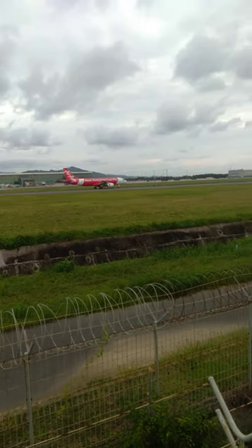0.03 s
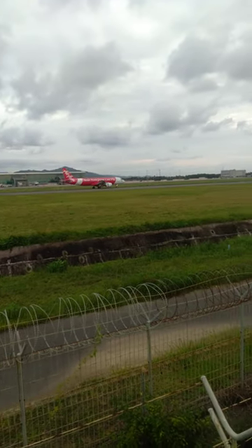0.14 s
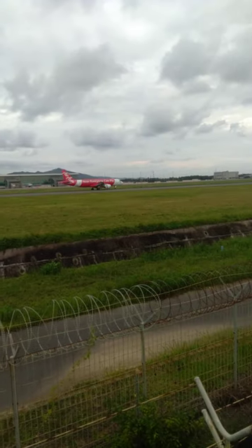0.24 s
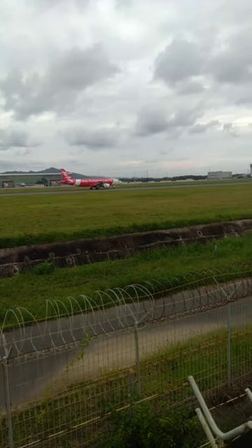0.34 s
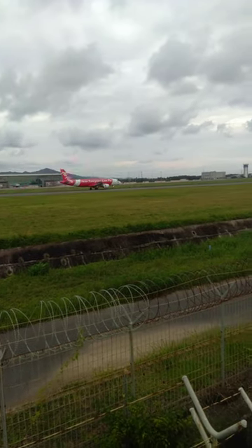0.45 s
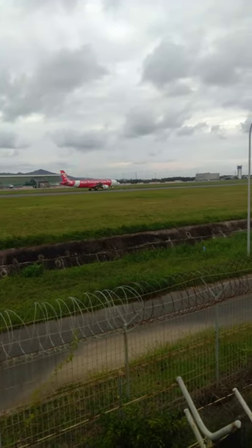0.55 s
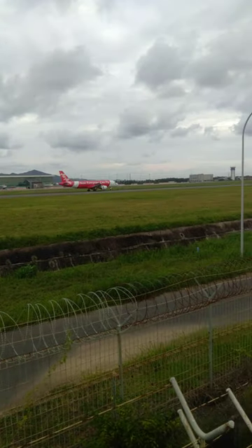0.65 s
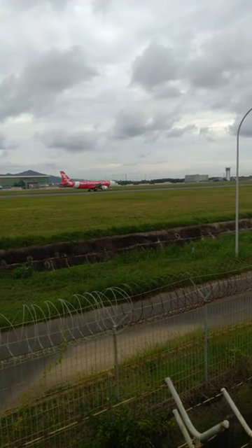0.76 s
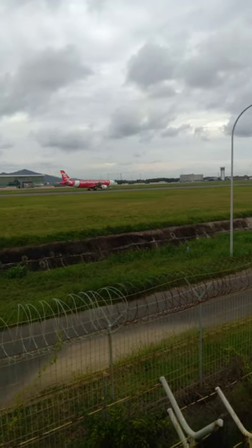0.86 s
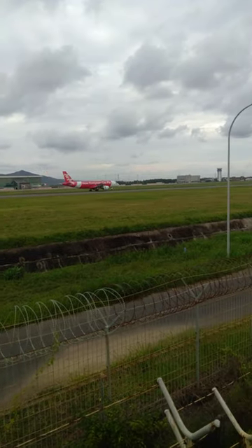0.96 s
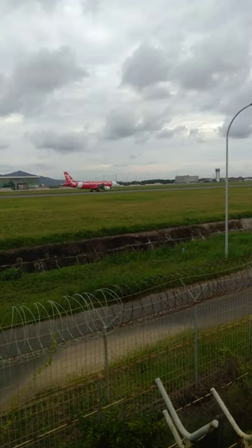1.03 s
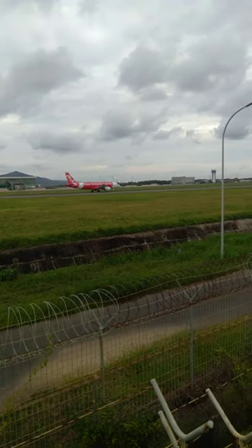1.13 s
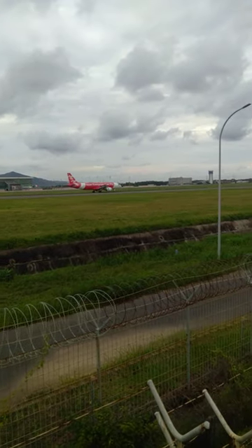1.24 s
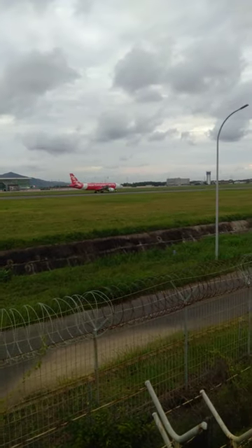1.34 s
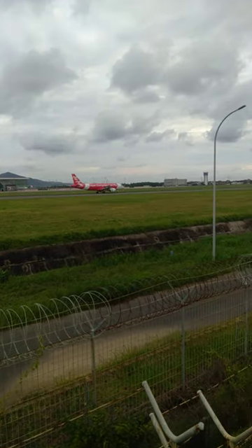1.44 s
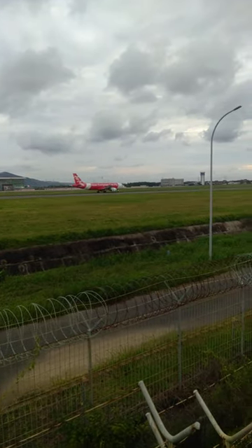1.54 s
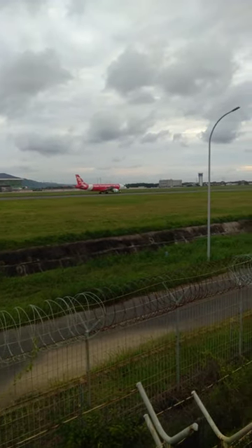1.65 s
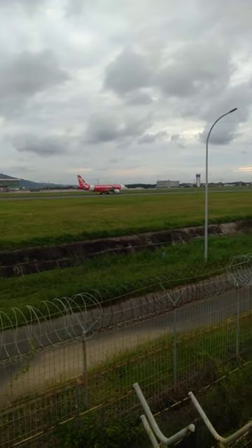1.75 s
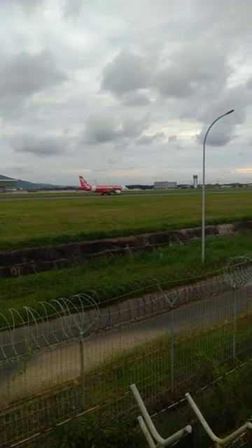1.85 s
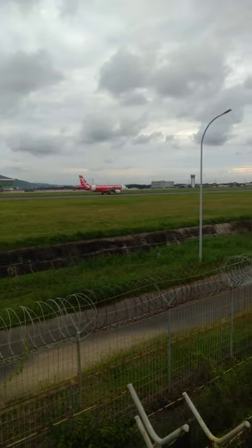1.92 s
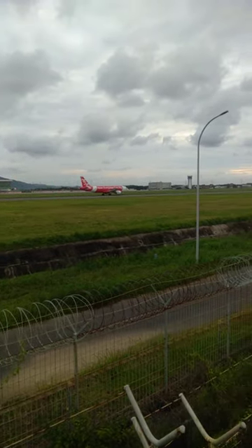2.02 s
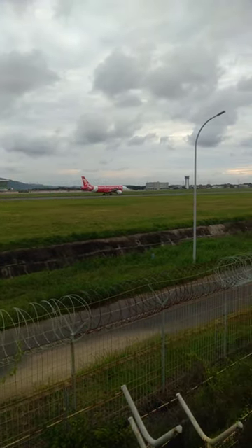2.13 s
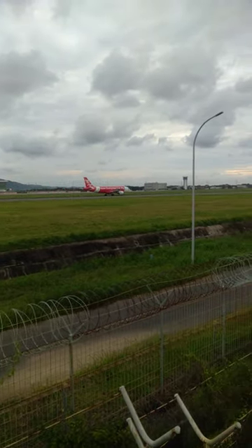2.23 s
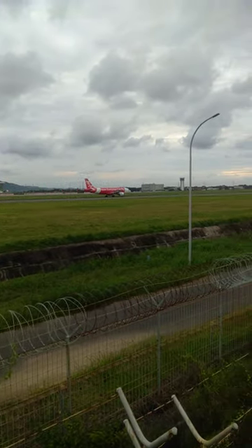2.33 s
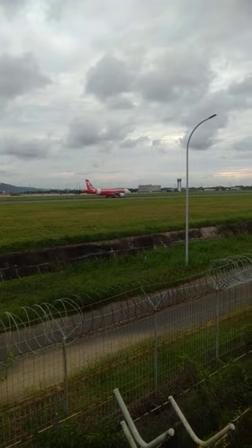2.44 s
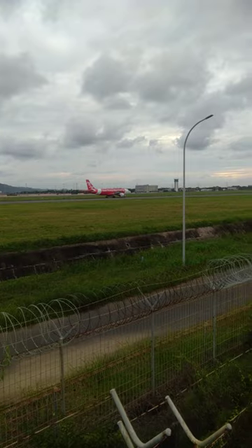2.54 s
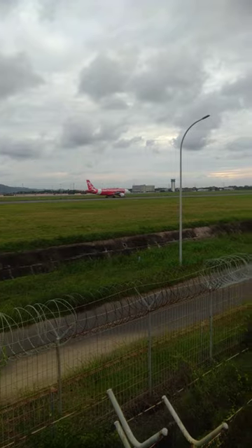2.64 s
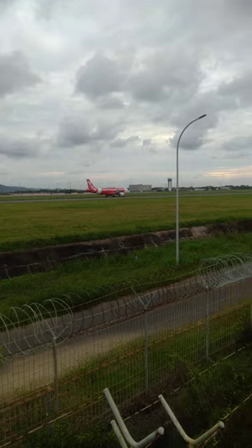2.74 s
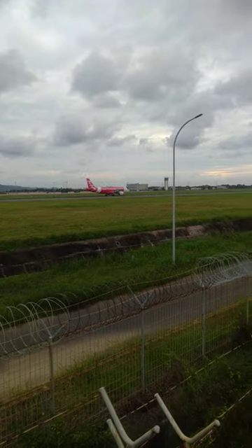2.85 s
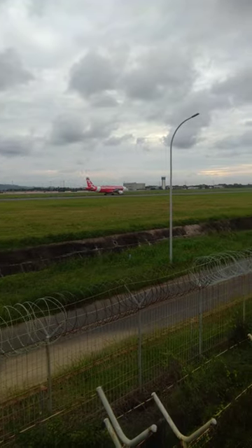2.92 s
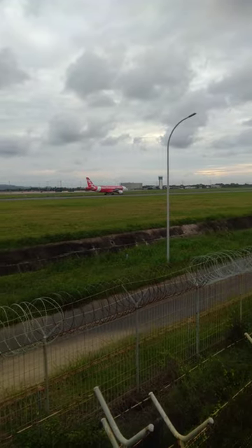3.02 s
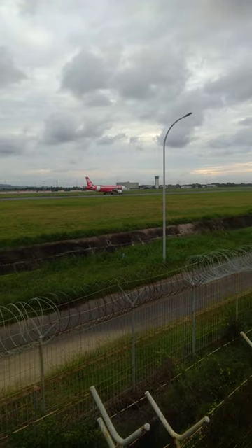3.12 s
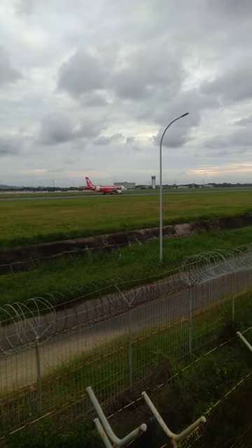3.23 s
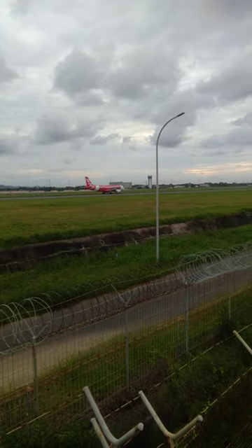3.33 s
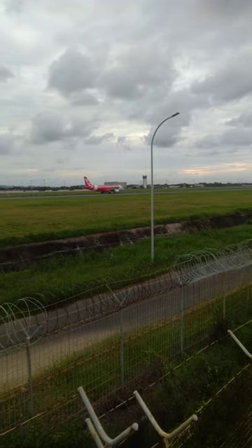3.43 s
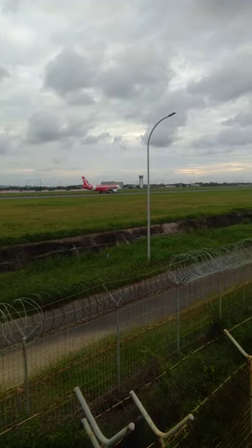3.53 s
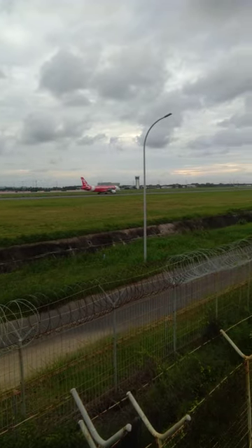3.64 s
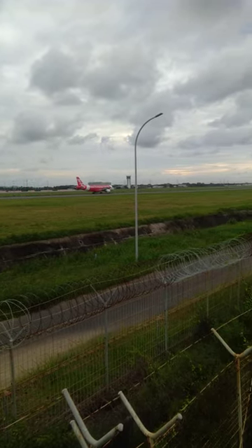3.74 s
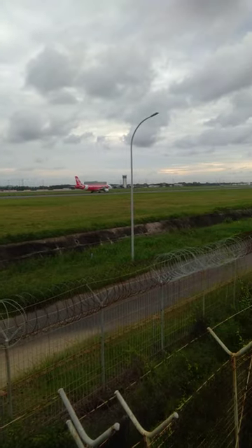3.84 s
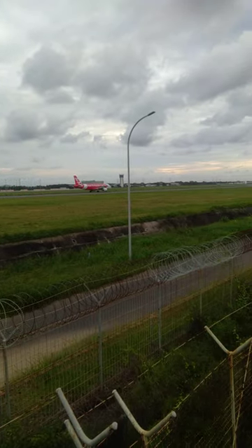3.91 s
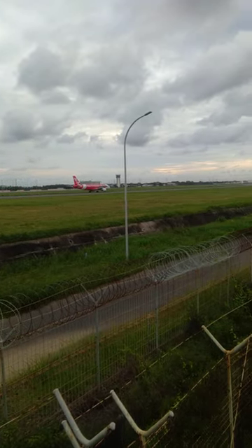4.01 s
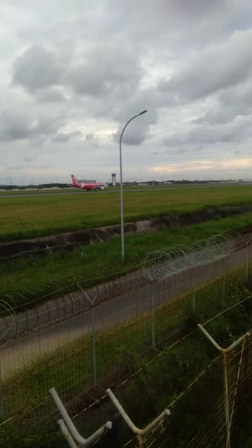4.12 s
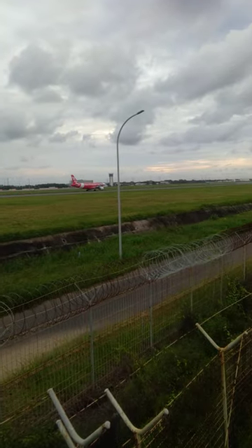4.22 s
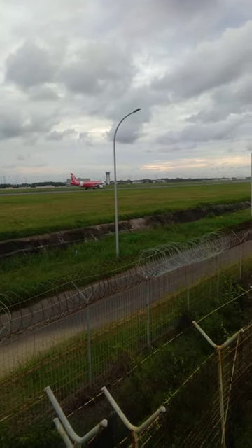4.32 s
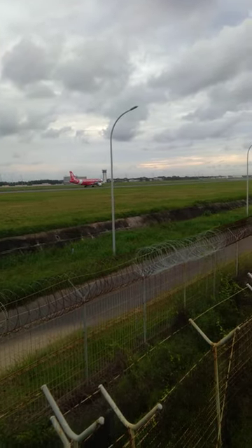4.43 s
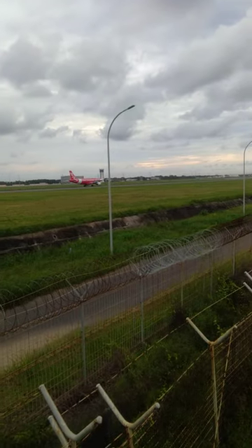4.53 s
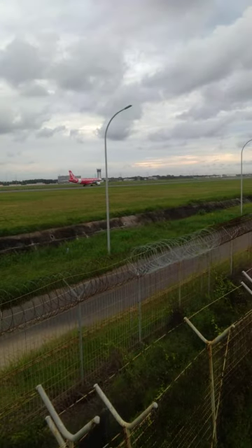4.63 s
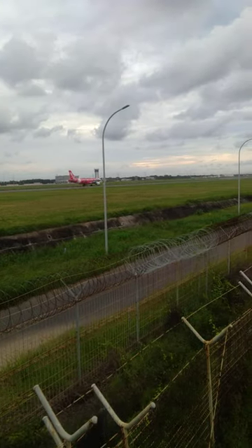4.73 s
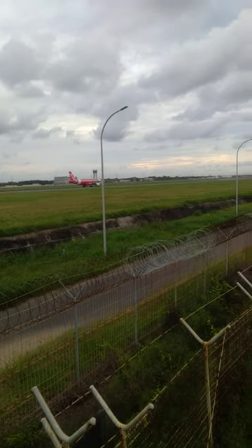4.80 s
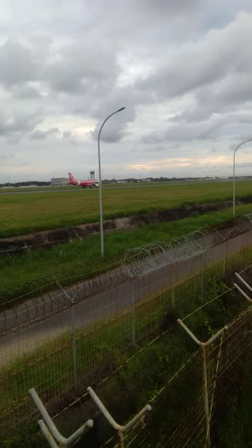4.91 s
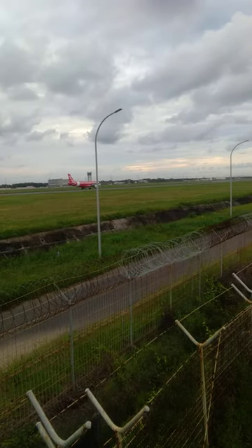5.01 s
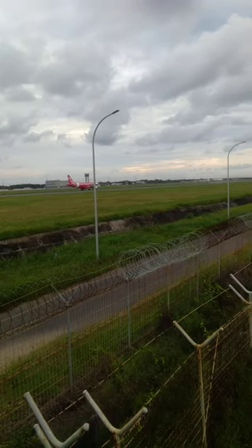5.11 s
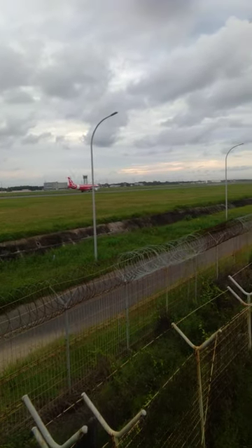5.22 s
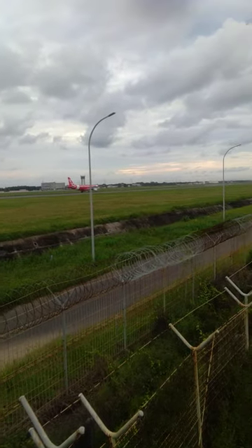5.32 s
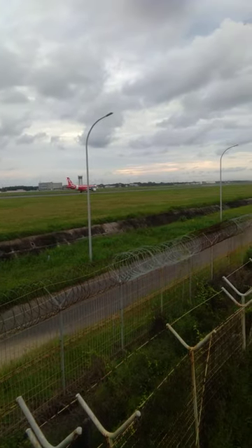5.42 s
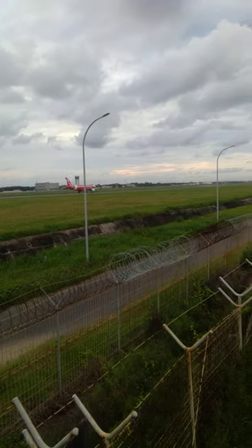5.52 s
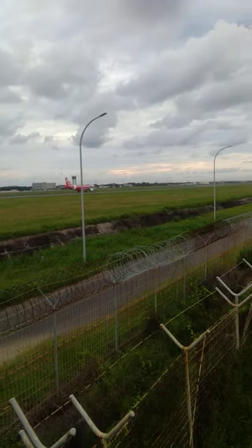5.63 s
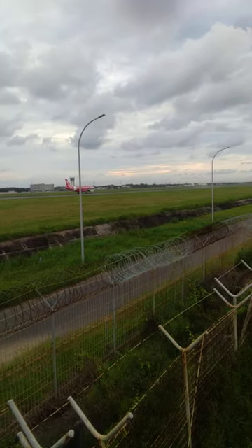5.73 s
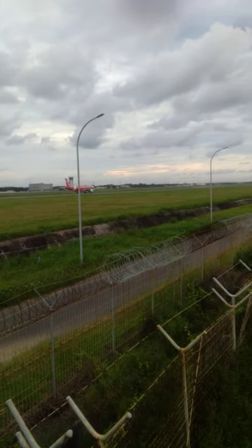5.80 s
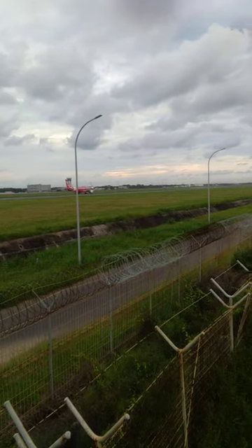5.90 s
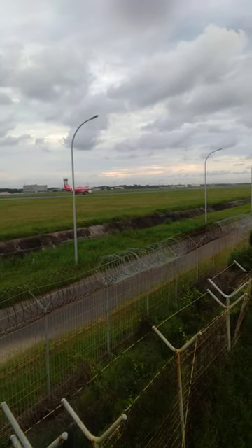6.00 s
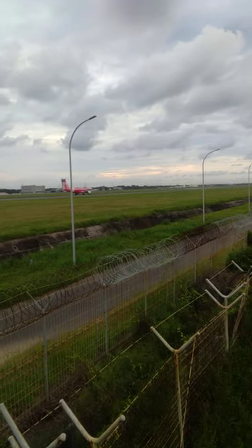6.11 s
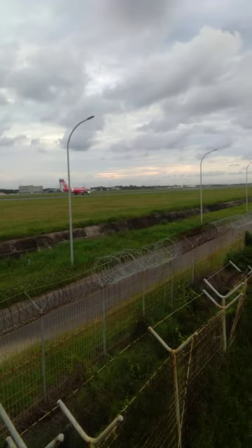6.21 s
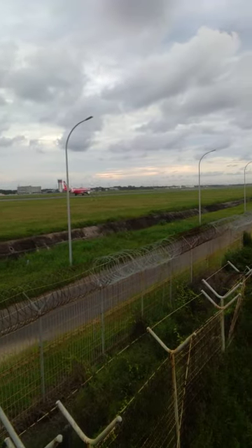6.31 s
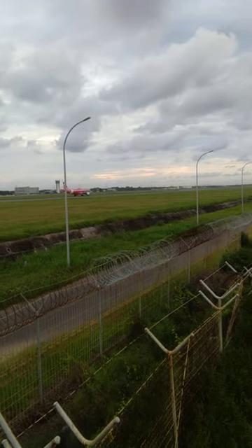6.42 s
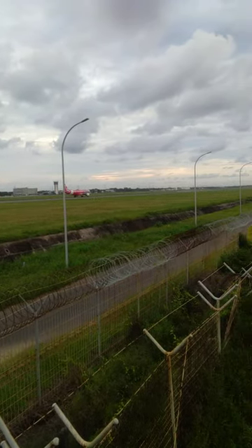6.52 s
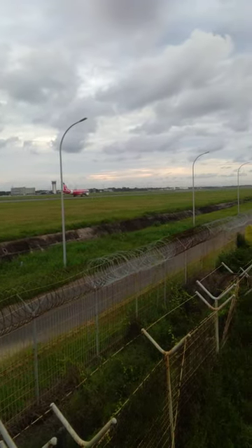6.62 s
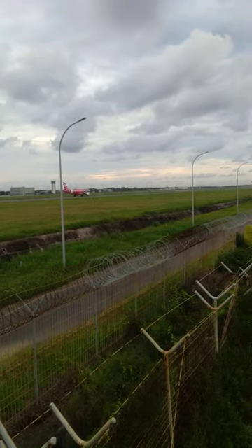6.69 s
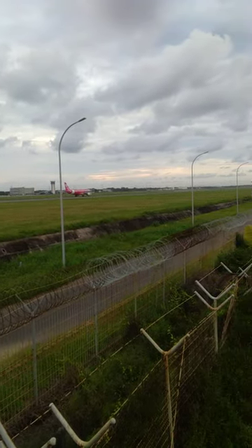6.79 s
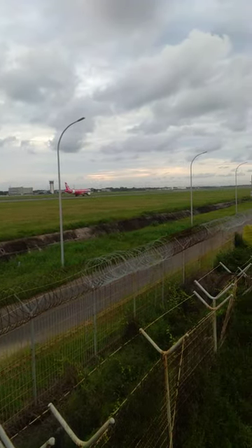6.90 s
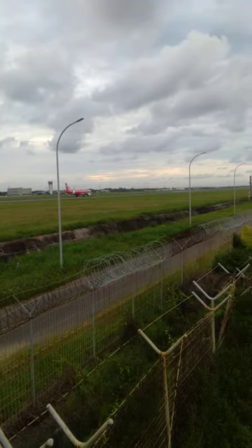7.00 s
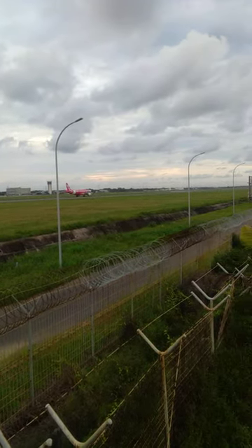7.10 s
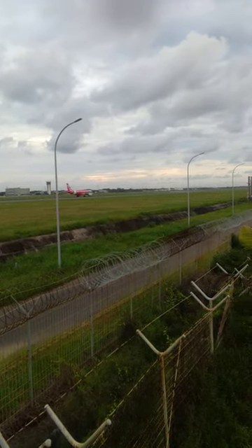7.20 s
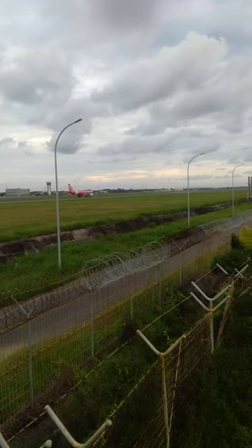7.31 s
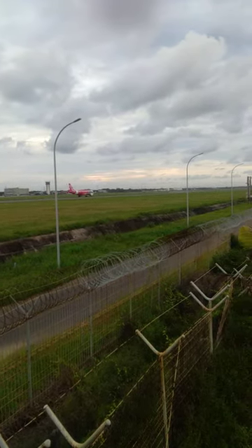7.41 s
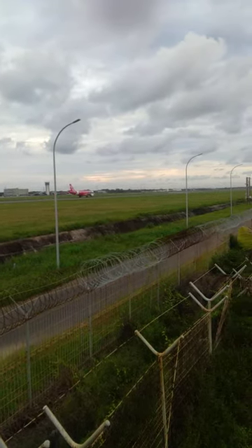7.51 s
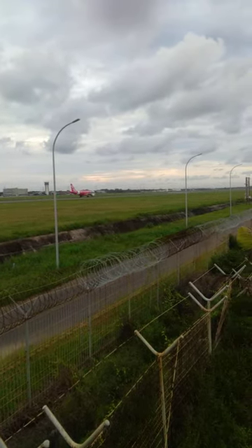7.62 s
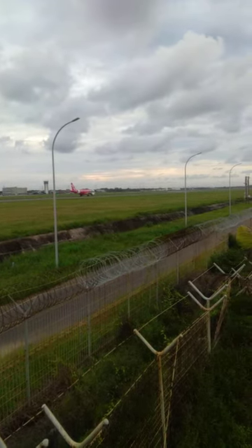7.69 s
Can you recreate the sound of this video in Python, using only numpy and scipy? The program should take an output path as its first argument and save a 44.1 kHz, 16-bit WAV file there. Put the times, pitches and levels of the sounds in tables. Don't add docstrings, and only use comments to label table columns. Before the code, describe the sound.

A landed passenger jet rolls away on a distant runway, its broad rumbling, hissing roar swelling and fading as wind thumps the microphone.

```python
import sys
import numpy as np
from scipy import signal
from scipy.fft import rfft, irfft
from scipy.io import wavfile
from scipy.ndimage import uniform_filter1d

SR = 44100
rng = np.random.default_rng(int(sys.argv[2]) if len(sys.argv) > 2 else 0)


def elevation(decibels):
    levels = np.asarray(decibels, float)
    return 10 ** (levels / 20)


def persist_wave(psi):
    counts = np.round(np.clip(psi, -1, 1) * 32767).astype(np.int16)
    wavfile.write(sys.argv[1], SR, np.atleast_2d(counts).T)


N = 341775

FRAME, HOP = 1024, 256
HZ = np.maximum(np.arange(FRAME // 2 + 1) * SR / FRAME, 1)[:, None]
TIMES = np.arange(N // HOP + 2) * HOP / SR
BLADES = 38
TOP_LAG = 0.74
WHINE_VEILED_DB = -65.5

# centre [s], half length [s], level [dB],
# brightness [0 all layers .. 1 treble only].
SWELL_ROWS = [(0.075, 0.14, 4.5, 0.022), (.4, 0.092, 0.5, 0.82), (0.704, 0.046, -3, 0.53),
              (.98, 0.084, 0, 1.1), (1.27, 0.065, -3, 0.46), (1.46, 0.052, 1, -2.1),
              (1.68, 0.049, -2, 0.97), (1.928, 0.067, 1.5, 0.67), (2.413, 0.17, 1.5, 0.18),
              (2.51, 0.011, 2, -0.39), (2.654, 0.077, -0.5, 3.2), (2.904, 0.14, 5, 0.3),
              (3.163, 0.076, 3, 1.2), (3.75, .17, 2.5, 1.6), (4.425, 0.097, -1.5, 0.6),
              (4.75, 0.064, 1.5, 0.25), (5.13, 0.08, 4.5, 0.45), (5.276, .08, 3.5, 1.4),
              (5.646, 0.079, -0.5, 1.3), (5.987, 0.051, 2, 1.1), (6.34, 0.15, 6.5, 0.72),
              (6.71, 0.07, 2, .9), (7.04, 0.045, 3, 1.1), (7.276, 0.16, -2, 0.56), (7.6, 0.05, 0, -2)]
# start [s], end [s], level [dB].
WHINE_SPELLS = [
    (4.6, 4.85, -64),
    (5.0, 5.15, -55.5),
    (5.17, 5.9, -64),
    (5.92, 6.18, -58),
    (6.3, 6.46, -55.5),
    (6.75, 6.9, -62),
    (7.02, 7.08, -60),
    (7.46, 7.63, -53),
    (7.7, 7.9, -59),
]


def rms_one(x):
    return x / np.sqrt(np.mean(x ** 2) + 1e-20)


def bump(hz, width_hz):
    return np.exp(-.5 * ((HZ - hz) / width_hz) ** 2)


def bells(rows, t):
    return sum(db * np.exp(-.5 * ((t - s) / half_s) ** 2) for s, half_s, db in rows)


def step(t, at_s, length_s):
    return .5 + .5 * np.tanh((t - at_s) / length_s)


def cleared(rows, t, edge_s, veiled_db):
    level_db = veiled_db
    for start_s, end_s, db in rows:
        inside = step(t, start_s, edge_s) * step(-t, -end_s, edge_s)
        level_db = level_db + (db - veiled_db) * inside
    return level_db


def patches(bins, frames):
    field = rng.standard_normal((len(HZ), len(TIMES)))
    for _ in range(2):
        field = uniform_filter1d(field, max(int(bins), 1), axis=0, mode="wrap")
        field = uniform_filter1d(field, max(int(frames), 1), axis=1, mode="wrap")
    return rms_one(field)


def drift(rate_hz):
    r = np.exp(-2 * np.pi * rate_hz * HOP / SR)
    slow = signal.lfilter([1], [1, -2 * r, r * r], rng.standard_normal(len(TIMES) + 500))[500:]
    return np.interp(np.arange(N) / SR, TIMES, rms_one(slow))


def coloured(spectrum):
    hz, level_db = np.transpose(spectrum)
    bin_hz = np.maximum(np.arange(N // 2 + 1) * SR / N, 1)
    shape = elevation(np.interp(np.log(bin_hz), np.log(hz), level_db, -200, -200))
    return rms_one(irfft(rfft(rng.standard_normal(N)) * shape, N))


def evened(x, over_s):
    size = int(over_s * SR)
    power = uniform_filter1d(uniform_filter1d(x ** 2, size), size)
    return x / np.sqrt(power)


def filtered(x, field_db):
    frames = signal.stft(x, nperseg=FRAME, noverlap=FRAME - HOP)[2]
    frames = frames * elevation(field_db + 0 * TIMES)[:, :frames.shape[1]]
    return signal.istft(frames, nperseg=FRAME, noverlap=FRAME - HOP)[1][:N]


def tone(hz, level_db, wander_hz, flutter_db, rate_hz):
    phase = 2 * np.pi * np.cumsum(hz + wander_hz * drift(rate_hz)) / SR
    level = elevation(level_db + flutter_db * drift(rate_hz))
    return np.sqrt(2) * level * np.sin(phase)


def blade_pitch(t):
    return 6590 - 75 * t - 5.2 * t ** 2 + 90 * np.exp(-t / .25)


def roar_levels(t):
    # start level [dB], fade [dB/s], turn [s], turn length [s], turn drop [dB].
    recede = [
        (-30, 0.97, 4.1, 0.38, 3),
        (-36.5, 0.04, 4.63, 1, 11),
        (-32, 0.85, 3.8, 0.22, 3.5),
        (-43, 0.56, 3, 0.9, 6),
    ]
    # centre [s], half length [s], level [dB].
    lumps = [(.56, 0.077, 3.5), (.85, 0.063, -2.5), (1.55, 0.17, 5), (1.95, 0.033, -1), (2.06, 0.031, 3),
             (2.26, 0.07, 2), (3.05, 0.078, 0.5), (3.83, 0.038, 1.5), (4.2, 0.025, 3.5), (4.66, 0.15, 3.5),
             (4.87, 0.071, -3), (5.35, 0.031, -2), (5.5, .08, 1.5), (5.86, 0.045, 4.5), (6.26, 0.04, 2.5),
             (6.55, .06, -4.5), (7.0, .07, 0), (7.25, 0.032, 3.5)]
    fan_db = bells([row[:3] for row in SWELL_ROWS], t)
    core_db = bells([(s, half_s, db * (1 - bright)) for s, half_s, db, bright in SWELL_ROWS], t)
    hiss_db = 0.88 * fan_db
    swings_db = (bells(lumps, t), core_db, fan_db, hiss_db)
    return [start_db - fade * t - drop_db * step(t, turn_s, length_s) + swing_db
            for (start_db, fade, turn_s, length_s, drop_db), swing_db in zip(recede, swings_db)]


def jet_roar():
    # frequency [Hz], level [dB per Hz].
    rumble = [(3, -22), (33, -20), (42, -28), (52, -6), (66, -4.5), (90, 1), (130, 1), (180, -2.5),
              (205, -5), (258, -13), (330, -25)]
    core = [(250, -38), (420, -9), (732, -1.5), (920, -12), (1090, -1), (1520, -8), (1700, -11.5),
            (2210, -32), (3740, -120)]
    fan = [(940, -33), (1600, -7.5), (2200, -6), (3100, -2), (3370, 0), (4450, -13), (5370, -14.5),
           (5600, -21), (7280, -49), (12300, -120)]
    hiss = [(4000, -6), (5400, -1), (6320, 1), (6620, 2), (7040, -3), (7670, -15), (8100, -17.5),
            (9000, -21.5), (10500, -32.5), (12300, -38), (15600, -53)]
    t = np.arange(N) / SR
    roar = np.zeros(N)
    for level_db, spectrum in zip(roar_levels(TIMES), (rumble, core, fan, hiss)):
        roar += elevation(np.interp(t, TIMES, level_db)) * evened(coloured(spectrum), over_s=0.18)
    return roar


def scattered_blades(roar):
    blade_hz = blade_pitch(TIMES)
    octave_db = 5.5 - 1.5 * TIMES
    humps_db = 3.0 * bump(blade_hz, width_hz=330) + octave_db * bump(2 * blade_hz, width_hz=200)
    whine_db = cleared(WHINE_SPELLS, TIMES, edge_s=.05, veiled_db=WHINE_VEILED_DB)
    humps_db = humps_db + .4 * (whine_db - WHINE_VEILED_DB) * bump(blade_hz, width_hz=80)
    humps_db = humps_db + 3.5 * bump(3340 + 23 * TIMES, width_hz=84)
    humps_db = humps_db + 3 * step(-TIMES, -4.2, .2) * bump(8200, width_hz=250)
    lag_db = -TOP_LAG * bells([(s, half_s, db * bright) for s, half_s, db, bright in SWELL_ROWS], TIMES)
    return filtered(roar, humps_db + lag_db * np.clip((HZ - 7000) / 1500, 0, 1))


def long_path(x):
    notch_hz = 1516 + 527 * np.sin(.5 * np.pi * TIMES / 11.7)
    depth_db = -8 * (1 - 0.46 * np.exp(-TIMES / 1.2))
    field_db = depth_db * bump(notch_hz, width_hz=100 + 10.0 * TIMES)
    field_db = field_db + 1.3 * patches(bins=4, frames=90)
    field_db = field_db + .5 * patches(bins=30, frames=30)
    field_db = field_db + .8 * patches(bins=150, frames=6) * np.clip(HZ / 6000, 0, 1)
    return filtered(x, field_db)


def shaft_hum():
    # start [s], end [s], level [dB].
    spells = [
        (.1, .55, -38),
        (.7, 1.3, -36),
        (2.2, 2.55, -36),
        (5.05, 6.15, -41.5),
        (5.3, 5.65, -48.5),
        (7.2, 7.9, -39),
    ]
    t = np.arange(N) / SR
    shaft_hz = blade_pitch(t) / BLADES
    level_db = np.interp(t, TIMES, cleared(spells, TIMES, edge_s=0.069, veiled_db=-51.5))
    hum = tone(shaft_hz, level_db, wander_hz=.7, flutter_db=1.1, rate_hz=3)
    octave = tone(2 * shaft_hz, level_db - 22.0, wander_hz=4.09, flutter_db=4.5, rate_hz=7.96)
    return hum + octave


def blade_whine():
    t = np.arange(N) / SR
    clear_db = cleared(WHINE_SPELLS, TIMES, edge_s=0.0077, veiled_db=WHINE_VEILED_DB)
    level_db = np.interp(t, TIMES, clear_db) + 2.5
    return tone(blade_pitch(t), level_db, wander_hz=6, flutter_db=2.5, rate_hz=25)


def open_air():
    # frequency [Hz], level [dB per Hz].
    spectrum = [(300, -17.5), (404, -1.5), (711, -4.5), (1000, -13), (1990, -8), (2400, -3.5), (3400, -7.5),
                (4700, -23.5), (6000, -18), (7500, -50), (9800, -37.5), (11500, -56), (13000, -54),
                (15600, -53)]
    return elevation(-44) * coloured(spectrum)


def wind_murmur():
    # frequency [Hz], level [dB per Hz].
    spectrum = [(200, -23), (260, -2), (330, -0.5), (430, -6.5), (520, -16)]
    # centre [s], half length [s], rise [dB].
    rises = [
        (.05, .2, 1.5),
        (1.6, 0.87, 6.5),
        (7.35, 0.22, 5),
    ]
    return elevation(-50.5 + bells(rises, np.arange(N) / SR)) * coloured(spectrum)


def gust_thumps():
    # start [s], thumps [count], peak level [dB], pitch [Hz].
    gusts = [
        (2.018, 2, -18, 130),
        (2.076, 1, -20, 110),
        (3.181, 1, -26, 320),
        (4.17, 4, -26, 150),
        (4.624, 8, -19.5, 135),
        (4.612, 5, -27, 260),
        (4.65, 1, -17.5, 390),
        (4.695, 1, -28, 380),
    ]
    gap_s, loss_db, half = .0145, 1.4, 800
    out = np.zeros(N)
    for start_s, count, peak_db, hz in gusts:
        cycles = np.arange(-half, half) / SR * hz
        thump = -np.cos(2 * np.pi * cycles - .6) * np.exp(-(cycles / 0.71) ** 2)
        for k in range(count):
            at = round((start_s + k * gap_s + rng.uniform(-0.0027, 0.0017)) * SR)
            out[at - half:at + half] += elevation(peak_db - k * loss_db) * thump
    return out


def scene():
    jet = long_path(scattered_blades(jet_roar())) + shaft_hum() + blade_whine()
    mono = jet + open_air() + wind_murmur() + gust_thumps()
    return np.array([mono, mono])


def phone_body(x):
    # frequency [Hz], width [Hz], level [dB].
    resonances = [(459, 42, -4), (864, 60, 2), (1340, 25, -2.5), (1516, 26, -5), (3080, 106, -1),
                  (3556, 48, 2), (3440, 100, -1), (3600, 82, -0.5), (4140, 170, 1.5), (5180, 100, -3.5),
                  (5470, 70, -4), (7540, 250, 0), (8800, 63, -5.5)]
    return filtered(x, sum(db * bump(hz, width_hz) for hz, width_hz, db in resonances))


def split_treble(mono):
    moments = [1.9, 2.455, 2.715, 3.06, 4.025, 4.15, 4.225, 4.875, 4.97, 5.175, 5.29, 5.665, 5.87, 6.265,
               6.57, 6.66, 7.22, 7.43, 7.5]
    field_db = np.full((len(HZ), len(TIMES)), -140.)
    for s, (low, wide) in zip(moments, rng.random((len(moments), 2))):
        low_hz = 4300 + 6500 * low ** 3
        high_hz = low_hz + 1000 + 8500 * wide ** 2
        band = (HZ > low_hz) & (HZ < high_hz)
        field_db[band & (np.abs(TIMES - s) < .012)] = -3 - 6 * low ** 3
    return filtered(np.roll(mono, 2000), field_db)


def roll_off(x):
    return signal.sosfilt(signal.butter(12, 15500, fs=SR, output="sos"), x)


def record(dry):
    mono = phone_body(dry[0])
    side = split_treble(mono)
    return roll_off(np.array([mono + side, mono - side]))


dry = scene()
out = record(dry)
persist_wave(out)
```